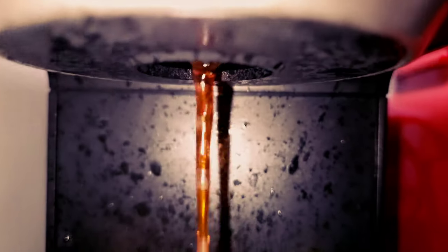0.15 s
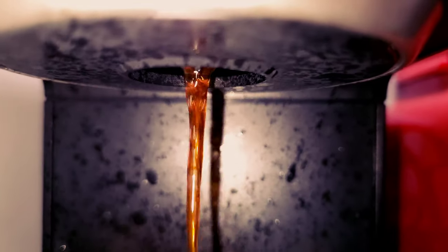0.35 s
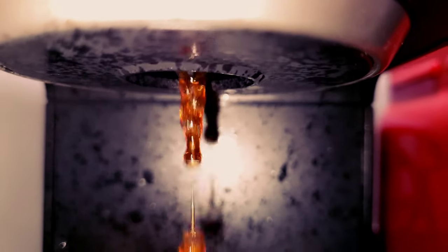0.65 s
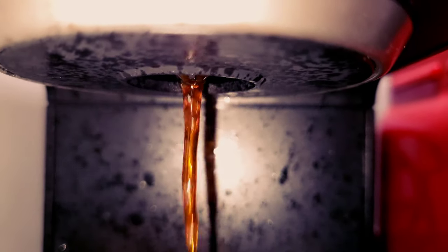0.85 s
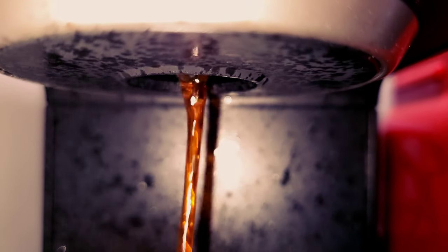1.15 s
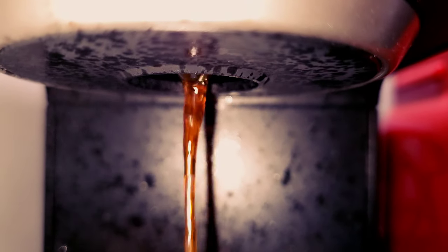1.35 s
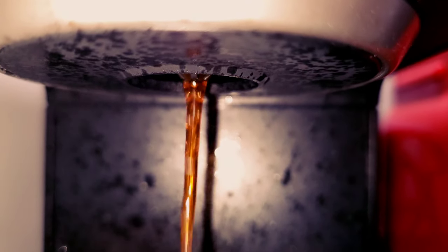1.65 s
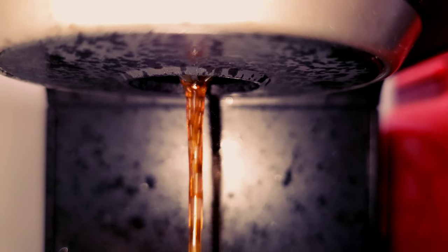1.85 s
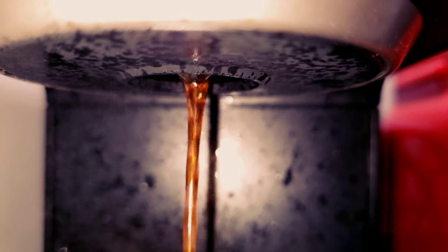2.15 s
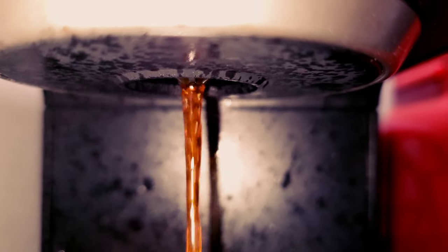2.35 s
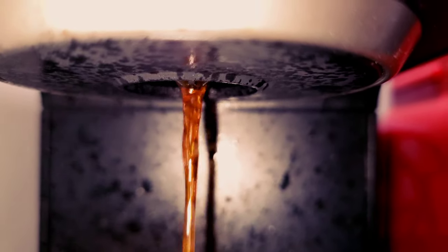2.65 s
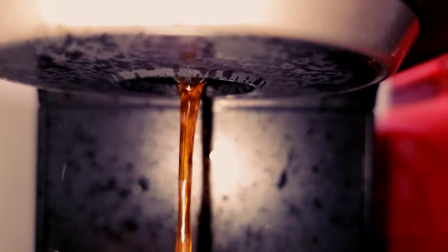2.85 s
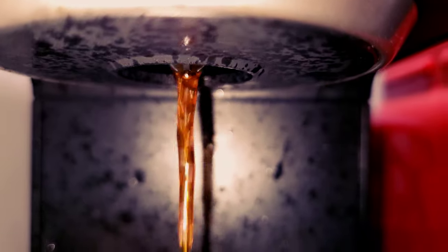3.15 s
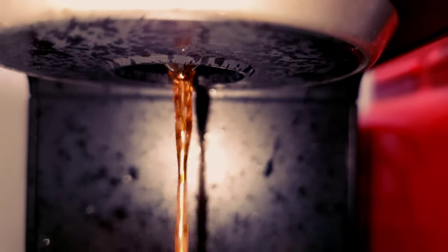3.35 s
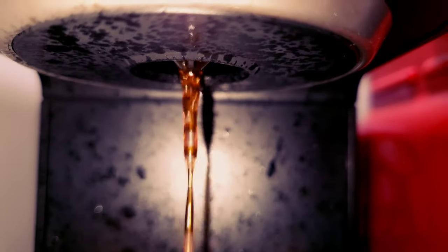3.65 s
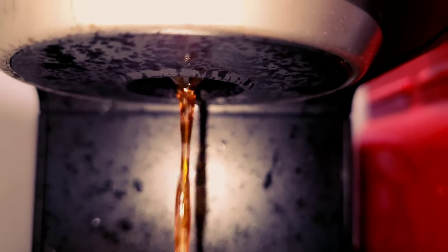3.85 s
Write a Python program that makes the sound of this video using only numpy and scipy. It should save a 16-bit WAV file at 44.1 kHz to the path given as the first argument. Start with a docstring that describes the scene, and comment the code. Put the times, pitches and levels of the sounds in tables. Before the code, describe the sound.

Close stereo pickup at the mouth of a coffee machine. Irregular plinks with quick upward blips and dry bright ticks come from coffee trickling into a mug, coloured by the hollow alcove, with very little room echo. Behind lies constant buzzing pump hum and dull rush. Faint, wavering high squeals of leaking air fall in pitch, in short repeated runs.

```python
"""A thin stream of coffee trickles into a mug in the alcove of a brewer, heard close up by two microphone ports.
The broken stream traps bubbles that plink in the hollow of mug and alcove, and droplets tick on the surface.
Air whistles through a seal in falling tones, made from sine waves with a wavering pitch and level.
Behind this the pump hums in steady tones and rattles the housing, and water rushes: both shaped noise."""
import sys
import numpy as np
from scipy import signal
from scipy.fft import rfft, irfft, next_fast_len
from scipy.io import wavfile
from scipy.ndimage import uniform_filter1d

SR = 44100
rng = np.random.default_rng(int(sys.argv[2]) if len(sys.argv) > 2 else 0)


def transcribe(u):
    """Save the signal u as a 16-bit wav file named by the first command-line argument.

    u: samples, shape (n,) or (channels, n), limited to [-1, 1]; the rate is SR.
    q: integer samples, one column per channel.
    """
    v = np.clip(np.atleast_2d(u).T, -1, 1)
    q = np.round(v * 32767).astype(np.int16)
    wavfile.write(sys.argv[1], SR, q)


N = 176841  # length in samples, about 4 s
M = next_fast_len(N)  # length of the Fourier transforms
T = np.arange(N) / SR  # time in seconds
F = np.maximum(np.fft.rfftfreq(M, 1 / SR), 1)  # frequency of each bin in Hz
STREAM_LAG_S = 0.0002496  # stream and whistle reach the right port this much later than the left


def undb(db):
    """Turn decibels into gain."""
    return np.exp(np.asarray(db) * np.log(10) / 20)


def level(x, db):
    """Scale a sound to an rms level in dB."""
    return x * undb(db) / np.sqrt(np.mean(x ** 2))


def curve(table):
    """Read a (Hz, value) table at every frequency bin, joining its points on a log frequency scale."""
    hz, value = np.transpose(table)
    return np.interp(np.log(F), np.log(np.maximum(hz, 1)), value)


def resonance(hz, width):
    """Response of one damped vibration, with gain 1 at its centre; width in Hz between -3 dB points."""
    return 1 / (1 + 1j * (F ** 2 - hz ** 2) / (F * width))


def ports(pan_db):
    """Left and right gains for a left-minus-right difference in dB."""
    return undb(np.array([[pan_db], [-pan_db]]) / 2)


def trail(radians):
    """Phase of a sound at the two ports: the right one lags by this angle."""
    return np.exp(-1j * radians * np.array([[0], [1]]))


def heard(spectrum):
    """Turn a spectrum back into sound."""
    return irfft(spectrum, M)[..., :N]


def walk(rate):
    """Smooth random wandering: values held for 1 / rate seconds, then smoothed twice; spread near 1."""
    k = int(SR / rate)
    steps = np.repeat(rng.standard_normal(N // k + 1), k)
    return 1.26 * uniform_filter1d(uniform_filter1d(steps, k), k)[:N]


def add(out, s, sound):
    """Mix a short stereo sound in at s seconds."""
    i = int(s * SR)
    out[:, i:i + sound.shape[1]] += sound[:, :max(N - i, 0)]


def noise_pair(gate):
    """Spectra of gated noise at the two ports: partly shared, as the machine surrounds the ports."""
    # Each row: frequency in Hz, share of the noise power common to both ports (0 to 1).
    likeness = [(30, 0.92), (60, 1), (200, 0.97), (450, 0.58), (800, 0.81), (1250, 0.98), (1700, 1),
                (2400, 0.6), (3100, 0.75), (3700, 0.7), (4600, 0.31), (8000, 0.17), (12000, 0.16)]
    # Each row: frequency in Hz, phase in radians by which the shared noise trails at the right port.
    lag_curve = [(60, 1), (200, -0.03), (450, 1.12), (800, -0.5), (1250, 0), (1620, -0.5), (2050, 1.5),
                 (2350, 0.77), (3700, 0.57), (4400, 0.9), (5400, 2), (7700, 13), (16000, 10)]
    common, left, right = rfft(gate * rng.standard_normal((3, N)), M)
    share = np.clip(curve(likeness), 0, 1)
    shared_part = np.sqrt(share) * common * trail(curve(lag_curve))
    return shared_part + np.sqrt(1 - share) * np.array([left, right])


def tone(turns, db, waver_db, spread):
    """A tone whose level wavers a little; the ports hear it at most `spread` turns apart."""
    left, right = 2 * np.pi * (spread * rng.random(2) + rng.random())
    sin, cos = np.sin(2 * np.pi * turns), np.cos(2 * np.pi * turns)
    pair = np.outer(np.cos([left, right]), sin) + np.outer(np.sin([left, right]), cos)
    return np.sqrt(2) * undb(db + waver_db * walk(5.93)) * pair


def water_rush():
    """Water and motor rush: noise with a set tone colour and a level that wanders."""
    # Loudness of the rush over frequency. Each row: frequency in Hz, relative level in dB per Hz.
    rush_colour = [(25, -13), (45, 3), (85, -12.5), (150, 1.5), (280, -10), (600, -12), (1250, -6.5),
                   (1760, -15), (2350, -25.5), (3310, -19.5), (3770, -18), (5450, -21), (11400, -38),
                   (16000, -26.5)]
    # How the rush leans to one side. Each row: frequency in Hz, left minus right in dB.
    balance = [(60, 1), (110, 1), (200, -13), (380, 7), (700, 14), (1290, 1.5), (2380, -14.5), (4400, -9),
               (8120, -7.5), (15000, 0)]
    tilt = curve(balance) / 2
    shape = undb(curve(rush_colour) + np.array([tilt, -tilt]))
    return level(heard(noise_pair(undb(1.46 * walk(20))) * shape), -51.5)


def motor_hum():
    """Motor and mains tones, each drifting slightly in pitch and level."""
    # Each row: middle frequency in Hz, middle rms level in dB.
    hum_tones = [(45, -68.5), (59.3, -61), (118.6, -62), (192.4, -47.5)]
    return sum(tone(np.cumsum(hz * (1 + 0.0061 * walk(12))) / SR, db, 0.96, 0.015)
               for hz, db in hum_tones)


def pump_hum(shaft):
    """The turning pump sounds at whole multiples of its shaft rate."""
    # Each row: multiple of the shaft rate, middle rms level in dB.
    harmonics = [(3, -57), (6, -60.5), (7, -78), (8, -80), (9, -60), (10, -59.5), (11, -68), (12, -59),
                 (13, -61), (14, -67.5), (15, -67.5), (17, -71.5), (18, -68), (20, -61), (21, -70),
                 (22, -68), (23, -67), (24, -69), (26, -65.5), (34, -69.5), (37, -64.5), (55, -69.5)]
    return sum(tone(k * shaft, db, 2.45, min(k / 60, 1)) for k, db in harmonics)


def housing_rattle(shaft):
    """Housing panels ring with noise that is strongest just after each pump stroke."""
    # Each row: frequency in Hz, width in Hz between -6 dB points, rms level in dB before
    # panning and wandering, left minus right in dB.
    panels = [(53.3, 81, -64, -4.5), (115, 25, -72.5, 3), (192.8, 10, -66.5, -15), (226.3, 49, -48.5, -2),
              (318, 94, -55.5, -1), (448, 140, -56.5, 5), (1260, 118, -58, -8), (2349, 204, -57.5, -10),
              (2590, 180, -72, -16), (3701, 270, -59.5, -0.5), (4760, 180, -77, 1), (7400, 130, -71, 0),
              (10960, 2600, -67, 5.5)]
    stroke = 1 + 0.3 * np.exp(-(shaft % 1) / 0.46)  # one stroke each turn
    shake = noise_pair(stroke)
    out = np.zeros((2, N))
    for hz, width, db, pan in panels:
        ring = heard(shake * np.abs(resonance(hz, width)) ** 2)
        out += ports(pan) * undb(0.96 * walk(10)) * level(ring, db)
    return out


def brewer():
    """The machine: one pump shaft drives both its hum and the rattle, beside motor hum and rush."""
    pump_hz = 36.56  # middle shaft rate in turns per second
    shaft = np.cumsum(pump_hz * (1 + 0.0005 * walk(3.23))) / SR  # turns so far
    return pump_hum(shaft) + motor_hum() + housing_rattle(shaft) + water_rush()


def whistle():
    """Air leaking through the seal: a breathy falling tone, restarting each time the seal reseats."""
    # One list for each leak. Each row: time in seconds, pitch in Hz before it wavers.
    leaks = [
        [(0, 3750), (.08, 3580), (.23, 3310)],
        [(.39, 4480), (.44, 4440), (.48, 4300), (.65, 3985), (.78, 3760), (.84, 3640), (1.05, 3394)],
        [(2.0, 4590), (2.04, 4570), (2.08, 4220), (2.105, 4390), (2.17, 3960), (2.26, 3830), (2.3, 3660),
         (2.35, 3670), (2.375, 3520)],
        [(2.63, 4490), (2.71, 4530), (2.77, 4230), (2.85, 4030)],
        [(2.87, 4200), (2.96, 4140), (3.04, 3695), (3.16, 3480)],
        [(3.33, 4450), (3.41, 4400), (3.46, 4260), (3.51, 4250), (3.57, 4230)],
        [(3.67, 4420), (3.73, 4470), (3.77, 4240)],
        [(3.785, 4250), (3.805, 4400), (3.93, 3936), (4.01, 3770)],
    ]
    # One value for each leak: rms level in dB at its loudest pitch, before flutter and panning.
    leak_db = [-53.5, -52, -51, -52, -49.5, -49, -50, -52]
    # The tone is faint while high and swells as it falls through a resonance.
    # Each row: pitch in Hz, level in dB.
    swell_curve = [(3350, -13), (3550, -3), (3700, 0), (3950, -4), (4100, -14), (4300, -13), (4550, -13)]
    patchy_db = 2.5  # how much the faint stretches break up
    out = np.zeros(N)
    waver, patches = walk(40), walk(36)
    flutter = undb(1.2 * walk(29.67) + 1.76 * walk(150))
    for (s, hz), db in zip(map(np.transpose, leaks), leak_db):
        fade = np.clip(np.minimum(T - s[0], s[-1] - T) / 0.0075, 0, 1)  # silent outside the leak
        pitch = np.interp(T, s, hz) * (1 + 0.00469 * waver)
        swell_db = np.interp(pitch, *np.transpose(swell_curve))
        faintness = np.clip(-swell_db / 12, 0, 1)
        swell = undb(swell_db + patchy_db * patches * faintness)
        sine = np.sqrt(2) * np.sin(2 * np.pi * np.cumsum(pitch) / SR)
        out += fade * flutter * swell * undb(db) * sine
    return heard(rfft(out * ports(-2.5), M) * trail(2 * np.pi * F * STREAM_LAG_S))


def scatter(low_hz, high_hz, db, spread_db, *same, count):
    """Make a table of many faint events at random moments, pitches and sizes, up to 6 dB to the left."""
    s, pitch, size, pan = rng.random((count, 4)).T
    event_db = db - spread_db * np.log(0.064 + size)
    hz = low_hz * (high_hz / low_hz) ** pitch
    return np.transpose([s * N / SR, event_db, hz, 6 * pan, *(c + 0 * s for c in same)])


def ticks(table):
    """A droplet hits: a crack of noise leaning to its tiny bubble's pitch, scattered to each port."""
    out, t = np.zeros((2, N)), T[:1200]
    crack = signal.butter(2, 5500, "high", fs=SR)
    noises = rng.standard_normal((len(table), 3, 1200))
    for (s, db, hz, pan, t60, bubble_db), (common, *own) in zip(table, noises):
        hiss = common + 0.86 * np.array(own)
        broad = signal.lfilter(*crack, hiss)
        narrow = signal.lfilter(*signal.iirpeak(hz, 4., fs=SR), hiss)
        fade = (1 - np.exp(-t / 0.00041)) * np.exp(-np.log(1000) * t / t60)
        burst = (broad + undb(bubble_db) * narrow / narrow.std()) * fade
        add(out, s, undb(db) * ports(pan) * burst / np.abs(burst).max())
    return out


def bubbles(table):
    """A trapped bubble starts with a splash, swells, rings and glides up as it nears the surface."""
    out, t = np.zeros((2, N)), T[:1000]
    end_fade = np.clip((t[-1] - t) / .004, 0, 1)
    for (s, db, hz, pan, t60, glide, splash_db), hiss in zip(table, rng.standard_normal((len(table), 1000))):
        ring = (1 - np.exp(-t * hz / 0.95)) * np.exp(-np.log(1000) * t / t60) * end_fade
        turns = hz * t * (1 + glide * np.minimum(t / t60, 1))
        note = ring / ring.max() * np.sin(2 * np.pi * turns)
        splash = signal.lfilter(*signal.iirpeak(1.45 * hz, 1.3, fs=SR), hiss) * np.exp(-t / 0.0069)
        splash /= splash[:200].std()
        add(out, s, undb(db) * ports(pan) * (note + undb(splash_db) * splash))
    return out


def loud_ticks():
    """The louder droplets hitting the surface, a little to the left."""
    # Each row: start in seconds, peak in dB before panning and the hollows, pitch in Hz,
    # bubble over crack in dB.
    droplets = [(0.0267, -29, 12200, 1), (0.0878, -37, 7700, 3), (0.097, -26, 8400, 4),
                (0.166, -38, 12100, 1), (0.1978, -32, 6840, 10), (0.2018, -21, 13300, -15),
                (0.2813, -43, 7000, 3), (0.368, -29.5, 6940, 15), (0.392, -30.5, 8950, -6),
                (0.4562, -26, 7100, -5), (0.512, -30.5, 11600, -10), (0.5485, -30.5, 9400, -2),
                (0.593, -30, 8400, 14), (0.6155, -35, 12200, -4), (0.645, -30, 9900, 7),
                (0.6852, -32, 7840, -4), (0.7199, -42, 6510, -3), (0.8327, -38.5, 7540, -2),
                (0.8807, -32.5, 12500, 6), (0.927, -32, 11400, 1), (0.9306, -31.5, 11400, 1),
                (1.0088, -34, 6700, 3), (1.0307, -33, 11400, -1), (1.047, -24.5, 11300, 3),
                (1.0707, -32, 11400, -5), (1.2441, -29, 11900, -4), (1.2653, -26.5, 12000, -12),
                (1.3681, -33.5, 8400, 5), (1.3842, -25.5, 7300, 23), (1.5112, -34, 10600, 12),
                (1.5553, -31.5, 10400, 3), (1.5585, -29, 9000, 5), (1.57, -33, 8900, 3),
                (1.609, -17.5, 10800, 9), (1.6453, -35, 7700, 3), (1.673, -24.5, 7000, -17),
                (1.7308, -37.5, 6400, 7), (1.7546, -41, 8300, 3), (1.775, -37, 6900, 3),
                (1.8302, -36, 11800, 8), (1.857, -30.5, 7300, -7), (1.92, -41, 11800, 3),
                (1.9975, -37, 11800, -4), (2.0047, -38, 6500, 5), (2.115, -40, 7140, 3),
                (2.1838, -34, 6700, -9), (2.2298, -38.5, 11700, 5), (2.2971, -35, 9000, 3),
                (2.439, -37, 8300, 3), (2.5869, -40, 10400, 3), (2.6164, -36.5, 11400, 3),
                (2.7042, -36, 9100, 3), (2.749, -35, 6550, -6), (2.8106, -40, 11400, 3),
                (2.831, -36, 12000, 10), (2.9949, -23, 10800, 20), (3.0153, -45, 11300, 0),
                (3.0975, -30.5, 10800, 1), (3.2234, -42, 10600, 3), (3.26, -35.5, 11500, 9),
                (3.2748, -39, 7000, 3), (3.3039, -37.5, 7100, 6), (3.3594, -35, 6500, -3),
                (3.3912, -27.5, 11400, 7), (3.4, -47, 11700, 3), (3.5985, -40, 8100, 3),
                (3.6163, -37, 12100, 1), (3.6399, -35, 12300, 3), (3.667, -41, 11300, 3),
                (3.7107, -38, 11700, 3), (3.756, -35, 6690, 1), (3.8165, -29.5, 7000, -9),
                (3.8407, -40, 6900, -1), (3.891, -35, 6640, 1), (3.9224, -41, 11800, 5),
                (3.9514, -43, 11200, 3), (3.9928, -32, 6800, 1)]
    return ticks([(s, db, hz, 2, 0.012, bubble_db) for s, db, hz, bubble_db in droplets])


def loud_bubbles():
    """The louder trapped bubbles; higher ones lean to the right."""
    # Each row: start in seconds, peak of the note in dB before panning and the hollows, starting
    # pitch in Hz, time in seconds to fade by 60 dB, half the upward glide over that time (share of pitch).
    plinks = [(0.0976, -27, 926, 0.013, 0.11), (0.1673, -30, 1045, 0.023, 0.53),
              (0.1662, -46, 2870, 0.012, 0.06), (0.202, -41, 2800, 0.016, 0.2),
              (0.2814, -24, 1280, 0.0041, 0.35), (0.305, -21, 1063, 0.018, 0.76),
              (0.369, -32, 1134, 0.022, 0.29), (0.4562, -50, 4000, 0.02, 0.055),
              (0.4638, -37, 1040, 0.0078, 0.31), (0.499, -43, 1020, 0.018, 0.06),
              (0.513, -38, 1034, 0.038, 0.078), (0.5135, -43, 2940, 0.032, 0.1),
              (0.5773, -36, 1040, 0.0087, 0.058), (0.6852, -46, 4850, 0.015, 0.06),
              (0.7199, -48, 2850, 0.021, 0.06), (0.8345, -48, 3900, 0.022, 0.066),
              (0.9268, -34.5, 1860, 0.013, 0.066), (0.9283, -40, 3170, 0.034, 0.98),
              (0.996, -39.5, 1130, 0.027, 0.28), (1.009, -37.5, 4100, 0.0057, 0.06),
              (1.086, -34, 990, 0.014, 0.71), (1.1523, -45, 1030, 0.024, 0.06),
              (1.1571, -46, 3020, 0.042, 0.05), (1.2134, -36.5, 1180, 0.023, 0.1),
              (1.2657, -29, 3190, 0.0076, 0.33), (1.284, -32, 990, 0.0035, 0.06),
              (1.2857, -39, 3030, 0.028, 0.06), (1.369, -38.5, 1020, 0.016, 0.24),
              (1.3838, -39, 1030, 0.027, 0.06), (1.4474, -41.5, 1230, 0.03, 0.06),
              (1.559, -32, 1120, 0.014, 0.1), (1.6422, -34.5, 1000, 0.044, 0.11),
              (1.6735, -42, 1020, 0.018, 0.06), (1.6963, -38, 1090, 0.024, 0.21),
              (1.8112, -38.5, 1020, 0.045, 0.1), (1.842, -21, 1002, 0.031, 0.38),
              (1.8603, -45, 3110, 0.035, 0.06), (1.873, -37, 1070, 0.019, 0.06),
              (1.9333, -32, 1050, 0.0063, 0.06), (2.0057, -30.5, 1450, 0.0048, 0.1),
              (2.0703, -41, 1100, 0.017, 0.11), (2.2368, -42, 1250, 0.03, 0.11),
              (2.3146, -36, 1110, 0.0091, 0.19), (2.4246, -40.5, 3850, 0.017, 0.26),
              (2.529, -30, 1090, 0.0099, 0.63), (2.616, -43, 4920, 0.012, 0.06),
              (2.6663, -44, 1020, 0.018, 0.06), (2.6985, -30, 1066, 0.023, 0.052),
              (2.7494, -22, 1030, 0.015, 0.43), (2.8596, -41, 3780, 0.022, 0.2),
              (2.8785, -32, 1240, 0.009, 0.25), (2.8897, -39.5, 996, 0.038, 0.06),
              (2.9037, -41, 4760, 0.012, 0.06), (2.9473, -44.5, 950, 0.035, 0.06),
              (2.995, -34.5, 1050, 0.021, 0.45), (3.099, -42, 1100, 0.016, 0.17),
              (3.1196, -45, 954, 0.034, 0.094), (3.1507, -42.5, 1030, 0.018, 0.06),
              (3.0995, -42.5, 2850, 0.018, 0.1), (3.1917, -40.5, 3090, 0.03, 0.055),
              (3.2866, -29, 1080, 0.031, 0.065), (3.3043, -29.5, 2740, 0.0085, 0.054),
              (3.3058, -39, 1060, 0.015, 0.1), (3.3518, -33.5, 1780, 0.016, 0.88),
              (3.3614, -34, 2990, 0.031, 0.1), (3.3922, -38, 3270, 0.0098, 0.06),
              (3.3928, -31.5, 1560, 0.01, 0.33), (3.402, -29.5, 1250, 0.0067, 0.33),
              (3.512, -32, 1190, 0.014, 0.077), (3.817, -26, 1325, 0.011, 0.054),
              (3.8413, -31, 1220, 0.011, 0.1)]
    s, db, hz, t60, glide = np.transpose(plinks)
    pan_db = 3 - 3.5 * np.log2(hz / 1000)  # 3 dB to the left at 1 kHz, 3.5 dB less per octave up
    # A -34.5 dB bubble has a -52 dB splash, which gains 0.69 dB per dB of bubble.
    splash_db = -52 + 0.69 * (db + 34.5) - db
    return bubbles(np.transpose([s, db, hz, pan_db, t60, glide, splash_db]))


def hollows():
    """The air in mug and alcove resonates and colours the splashing, differently at each port."""
    # Each row: frequency in Hz, width in Hz, left gain in dB, right gain in dB.
    air_modes = [(964.5, 79, 9, -36), (1204, 166, -1, -3.5), (1604, 73, 13, 15.5), (2064, 77, 8.5, -26),
                 (2860, 300, 7.5, -14), (3964, 83, -7, 8.5), (4870, 340, 1, 1), (6100, 85, -19, 8),
                 (6850, 140, 4, 5), (7680, 250, -3.5, -26), (8910, 350, -0.5, -35), (9920, 400, 1, -33),
                 (10890, 190, 1.5, -18), (11700, 480, 0, -39), (13300, 340, -4, -10)]
    left, right = [sum(undb(mode[k]) * resonance(*mode[:2]) for mode in air_modes) for k in (2, 3)]
    return undb(-5.5) + np.array([left, right])


def kitchen():
    """The kitchen's echo: the direct sound plus a short fading tail of noise."""
    tail_t60_s, tail_db = 0.093, -13.5
    onset = np.clip(T / 0.0013, 0, 1)  # the tail rises over 1.3 ms
    tail = onset * rng.standard_normal((2, N)) * np.exp(-np.log(1000) * T / tail_t60_s)
    tail /= np.sqrt(np.sum(tail ** 2, axis=1, keepdims=True))
    return 1 + undb(tail_db) * rfft(tail, M)


def stream():
    """All of the splashing, coloured by the hollows and followed by the kitchen's tail."""
    water = loud_bubbles() + loud_ticks()
    water += bubbles(scatter(920, 1300, -45, 1.7, 0.025, 0.085, -27, count=8))  # softer plinks
    water += ticks(scatter(7000, 14000, -43.5, 1.5, 0.012, 2.7, count=35))  # softer ticks
    water += bubbles(scatter(840, 4950, -60, 3.33, 0.0172, 0.64, -0.5, count=300))  # faint bubbling
    water += ticks(scatter(5000, 14200, -48.5, 0.87, 0.023, 2.7, count=300))  # faint ticking
    lag = trail(2 * np.pi * F * STREAM_LAG_S)
    return heard(rfft(water, M) * hollows() * lag * kitchen())


def scene():
    """Machine, seal and stream together."""
    return brewer() + whistle() + stream()


def record(dry):
    """The microphone loses the deepest bass and the top; a steep filter cuts above 16.3 kHz."""
    # Each row: frequency in Hz, microphone gain in dB.
    mic_colour = [(28, -10), (42, 0), (15450, 0), (15600, -8), (16500, -22)]
    coloured = heard(rfft(dry, M) * undb(curve(mic_colour)))
    return signal.sosfilt(signal.butter(16, 16300, fs=SR, output="sos"), coloured)


dry = scene()
out = record(dry)
transcribe(out)
```